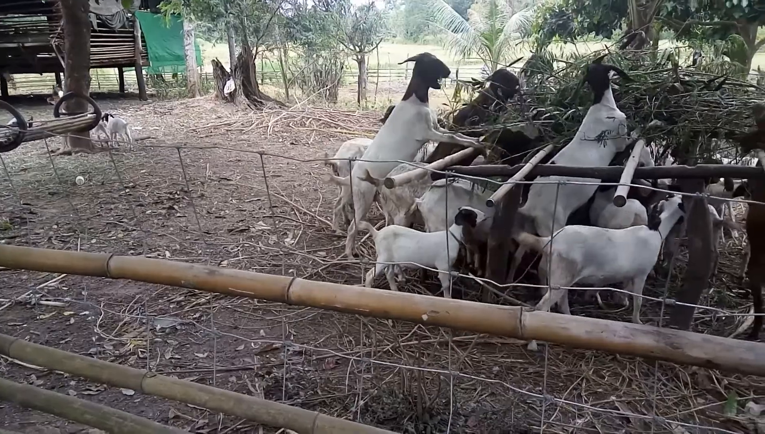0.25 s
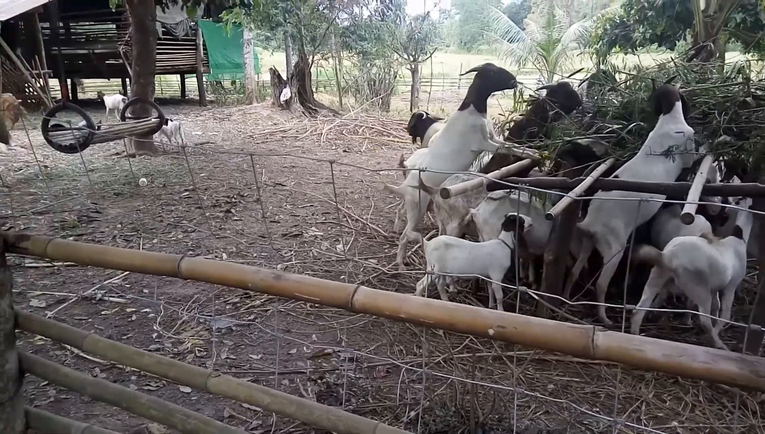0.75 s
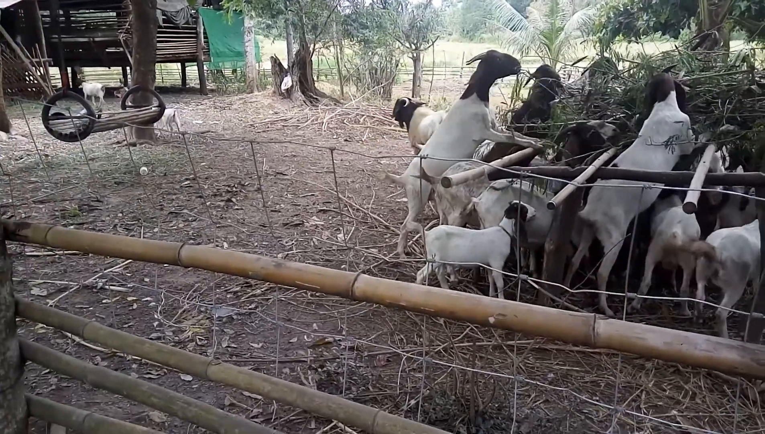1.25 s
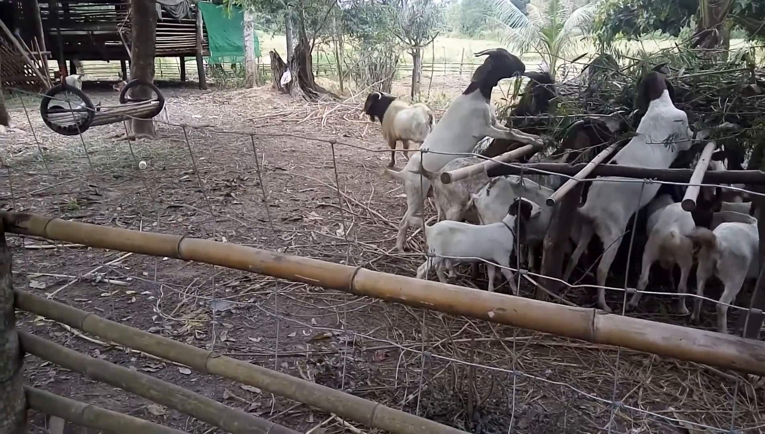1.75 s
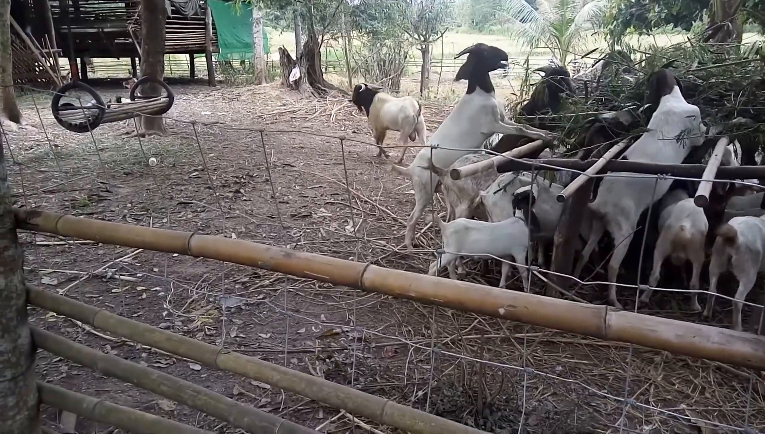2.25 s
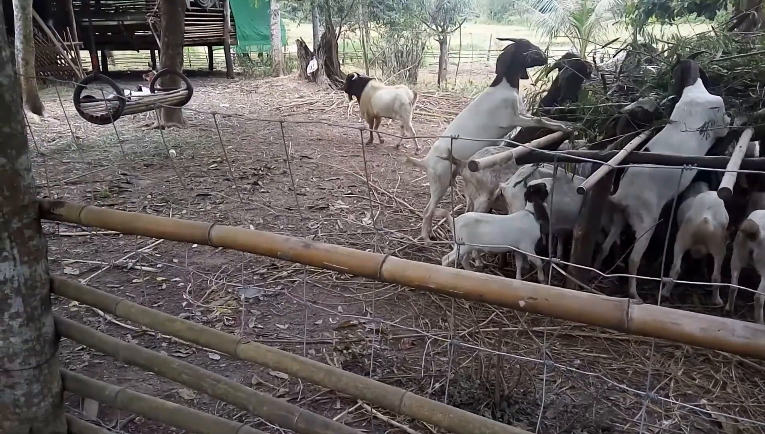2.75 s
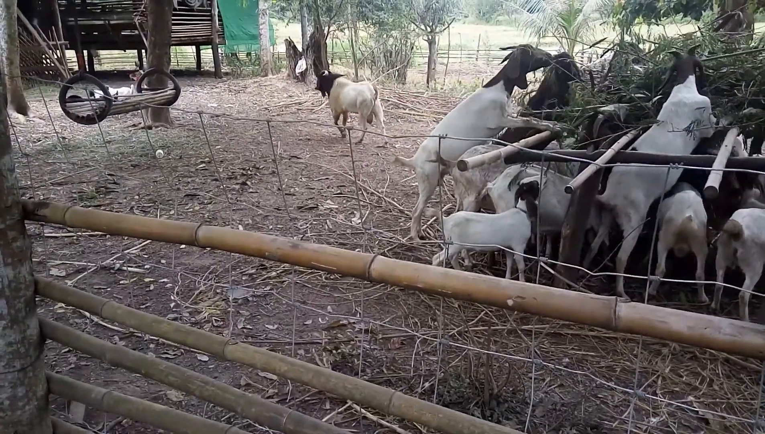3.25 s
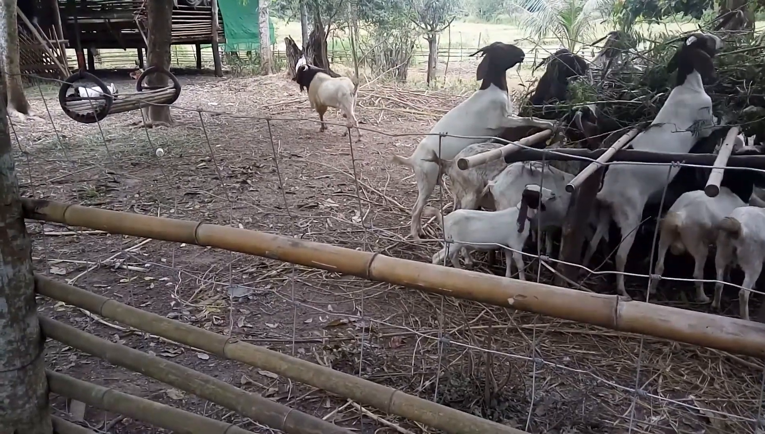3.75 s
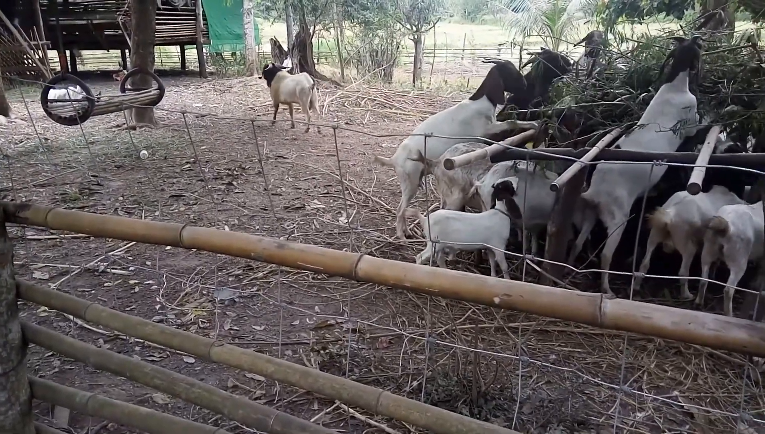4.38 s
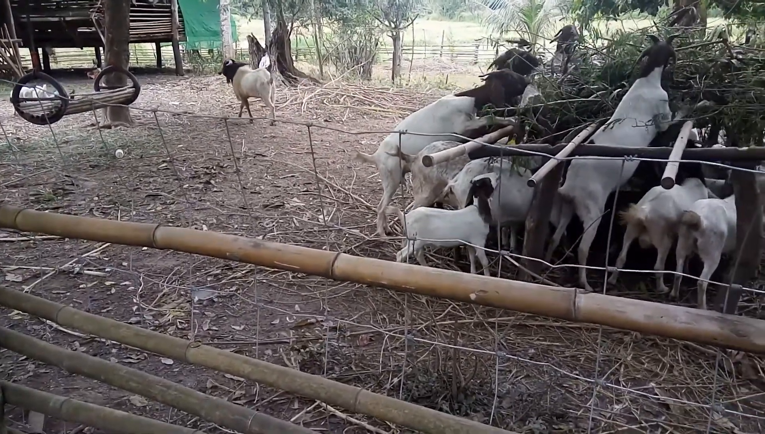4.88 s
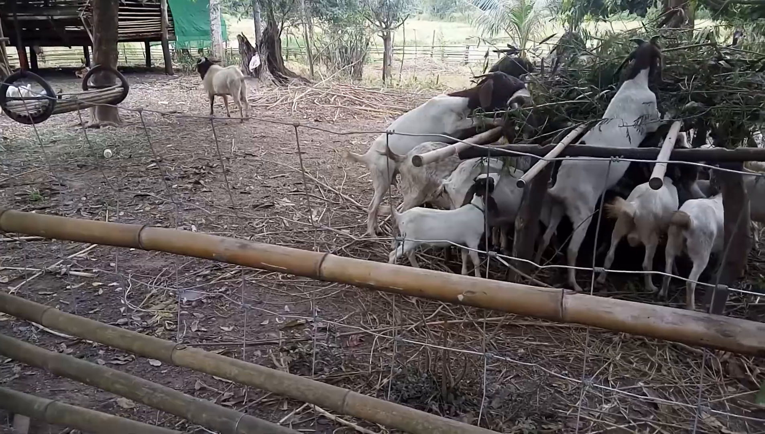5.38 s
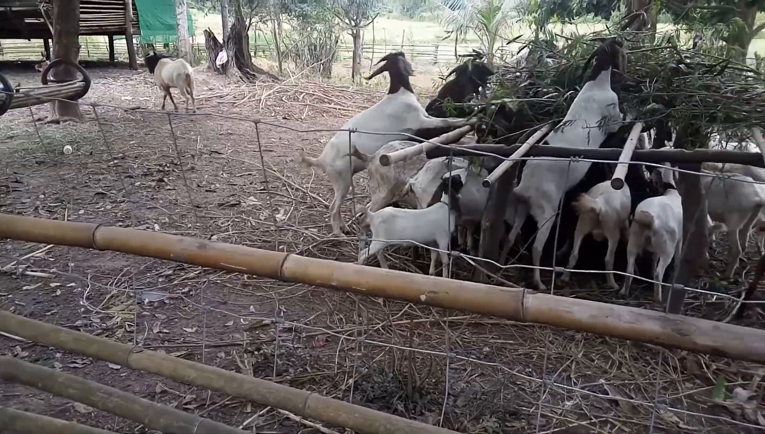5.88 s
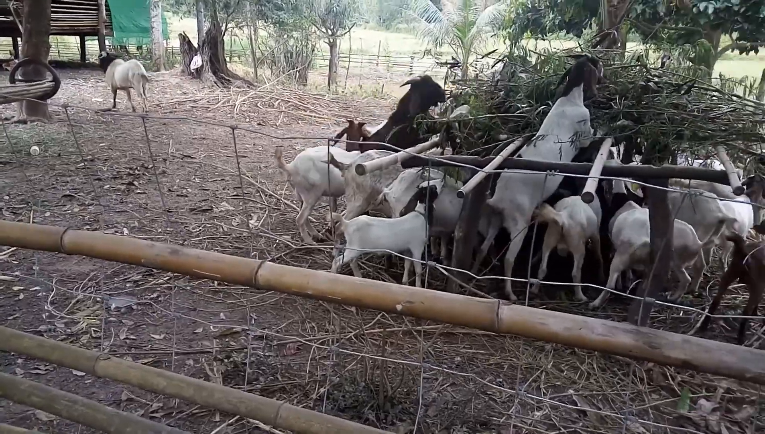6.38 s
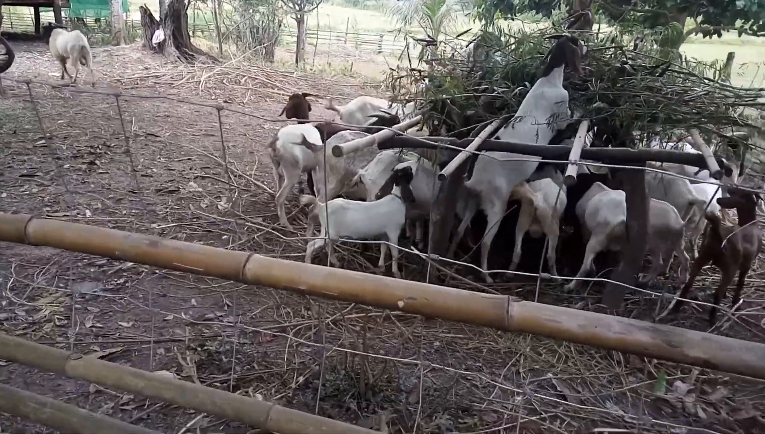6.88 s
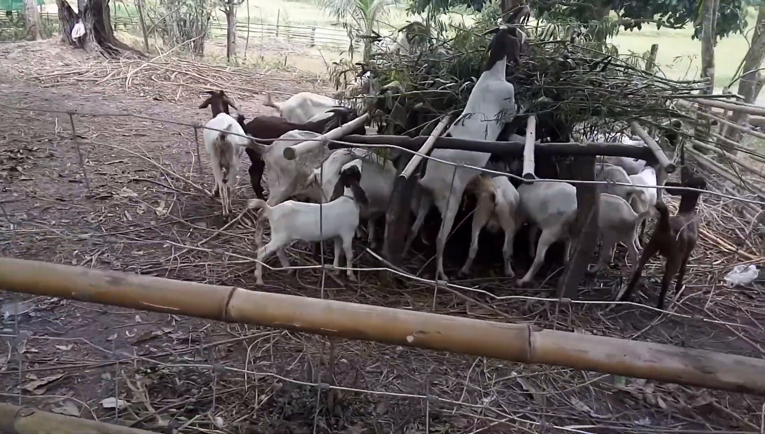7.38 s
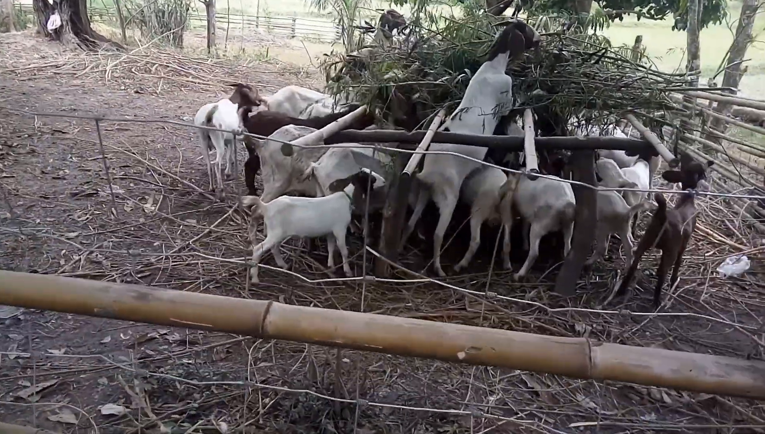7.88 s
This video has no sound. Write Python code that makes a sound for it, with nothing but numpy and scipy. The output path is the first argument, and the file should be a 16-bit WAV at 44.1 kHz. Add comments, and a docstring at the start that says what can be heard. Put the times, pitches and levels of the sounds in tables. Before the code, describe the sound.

Close outdoor view of a goat herd stripping a pile of leafy branches in a dirt pen. Bright, crackly rustling surges and eases constantly, peppered with sharp twig snaps. Soft hoof knocks and litter shuffling sit beneath. A small neck bell tinkles now and then, a fainter one answers on the left, and light wind bumps the right side of the hand-held phone's stereo microphone.

```python
"""Goats strip a heap of leafy branches a few metres from a hand-held phone, in light wind on its right port.
From the start, noise bands under swelling levels rustle as leaves, short noise bursts snap as twigs and
damped modes knock as hooves; a near neck bell of beating tone pairs tinkles on and off throughout.
From 1.5 s single tones make a fainter bell on the left; low ringing wind puffs peak near 2.2 s, and three
short high tones squeak near 6.3 s. The phone ducks its gain around the loudest snaps."""
import sys
import numpy as np
from scipy import signal
from scipy.fft import rfft, irfft
from scipy.io import wavfile
from scipy.ndimage import uniform_filter1d

SR = 44100
rng = np.random.default_rng(int(sys.argv[2]) if len(sys.argv) > 2 else 0)


def dump_mix(stems):
    """Bounce the given channels to the path in sys.argv[1] as a 16-bit WAV at rate SR."""
    frames = np.atleast_2d(stems).T  # one column per channel
    limited = np.clip(frames, -1, 1)  # hard clip at full scale
    pcm = np.round(limited * 32767).astype(np.int16)
    wavfile.write(sys.argv[1], SR, pcm)


N = 358533
T = np.arange(N) / SR

# Puffs thumping the right port. Each row: start in seconds, peak in dB, pitch in Hz.
WIND_PUFFS = [(0.039, -26, 95.5), (1.289, -31, 98.38), (1.469, -30, 101), (2.103, -30.5, 116),
              (2.209, -14, 129), (2.26, -19, 113), (2.298, -30, 135), (2.319, -30, 109), (2.589, -28.5, 94),
              (2.665, -23, 115.7), (2.739, -33, 101), (2.844, -34, 122), (3.789, -28, 117),
              (4.813, -27, 97.81), (4.911, -23, 100.7), (4.968, -25, 154), (5.157, -22, 107.6),
              (5.26, -28.5, 142.2), (5.299, -25, 107.4), (5.533, -22.5, 160.5), (5.56, -26.5, 144),
              (6.004, -26, 86.58), (6.053, -23, 95), (6.165, -21, 106.2), (6.477, -24, 100.1)]
# Loudness of feet shuffling in litter. Each row: time in seconds, level in dB.
SHUFFLE_LEVEL = [(0.0, -37), (0.4, -44.5), (1.65, -43.5), (2.8, -47), (3.26, -42.5), (3.58, -46),
                 (4.21, -41), (5.2, -44), (5.43, -41), (5.98, -49), (6.27, -38.5), (6.84, -39.5),
                 (7.61, -41.5), (7.81, -44.5), (8.13, -43.5)]
# Tone balance of the shuffling. Each row: frequency in Hz, relative level in dB per Hz.
GROUND_SPECTRUM = [(18, -45), (30, -4), (43, -38), (82, 4.5), (108, 0), (345, 3.5), (457, -7.5), (555, -3),
                   (860, -1), (1290, -13.5), (2000, -6), (2600, -34), (4400, -120)]
# How alike the ground sounds at both ports. Each row: frequency in Hz, likeness (held to 0..1 in use).
PORT_LIKENESS = [(60, 0.5534), (130, 1), (290, 0.91), (640, 0.7137), (1410, -0.0887), (3100, -0.12),
                 (6820, -0.07), (15000, -0.01)]
# Blows of the distant bell, its pitch wavering as it swings. Each row: start in seconds, level in dB, pitch in Hz.
DISTANT_BLOWS = [(1.5016, -35.5, 3167), (1.5444, -37.5, 3200), (1.6483, -37, 3170), (1.735, -38, 3100),
                 (1.8244, -38.5, 3195), (2.704, -37.5, 3093), (3.3189, -38, 3080), (3.419, -36.5, 3080),
                 (3.4694, -34.5, 3104), (3.5746, -34, 3155), (3.6677, -34, 3139), (7.435, -37.5, 3062),
                 (7.5238, -35, 3096)]
# Green wood rubbing on a pole. Each row: start in seconds, level in dB, pitch in Hz.
WOOD_SQUEAKS = [(6.2701, -30.5, 2400), (6.316, -33, 2370), (6.3704, -33, 2425)]
# Clapper blows on the near bell. Each row: start in seconds, level in dB, extra level of the upper pair in dB.
CLAPPER_BLOWS = [(0.0359, -32, -8), (0.778, -32, 5), (0.84, -35, -8), (1.5594, -34.5, -4), (1.709, -36, -8),
                 (2.1171, -34, 0.5), (2.3755, -34, 6), (2.9665, -31.5, 1), (3.5838, -33.5, 1.5),
                 (4.0861, -25, 3), (4.3097, -39, 4), (5.616, -33, 3), (5.673, -35, -9), (7.1594, -35, -6)]
# Split mode pairs that beat. Each row: pitch in Hz, relative level in dB, free 60 dB decay in seconds.
BELL_MODES = [(3978, 0, .9), (3950, -8, .6), (9706, 0, .4), (9678, -7, .4)]
# Hoof falls. Each row: time in seconds, level in dB, pitch of the ring in Hz, toe knock against the ring in dB.
HOOF_FALLS = [(0.073, -35, 377, -4), (0.279, -34.5, 1056, -13), (0.693, -38, 470.3, 3),
              (0.87, -38, 394.5, 3.5), (1.2, -36.5, 805, -6), (1.577, -34, 261.5, 4.5),
              (1.782, -40, 936.2, -2), (1.859, -33, 504.6, 1), (2.186, -32.5, 253, 1.5),
              (2.375, -38, 900, -3), (2.483, -35, 320, 4.5), (2.545, -34, 266.4, -7.5),
              (2.763, -32.5, 517.5, -1), (2.833, -39, 444, -2), (2.867, -36, 360, 5.5),
              (3.066, -31, 277, 0.5), (3.369, -32.5, 244.9, 3), (3.606, -36, 671.5, 4.5),
              (3.713, -36, 202, -12), (3.904, -27, 269.2, -4), (4.094, -30.5, 318, -17.5),
              (4.181, -32, 318.6, -15), (4.237, -35, 304, -4), (4.555, -30, 895, -0.5),
              (4.846, -32, 323.4, -3), (5.093, -36, 349.8, -3), (5.274, -32, 890, -9),
              (5.507, -34, 907, -17.5), (5.958, -24.5, 445, -2.5), (6.273, -28.5, 255, -1.5),
              (6.315, -29, 263, -12.5), (6.475, -32.5, 770, -6), (6.556, -31, 403, -13.5),
              (6.621, -33, 312, -12), (6.771, -30, 375, -5), (7.023, -38, 1032, -12.5),
              (7.176, -41, 340, -6), (7.213, -33.5, 340.9, -13), (7.408, -30, 360, 2),
              (7.492, -38, 385, -4), (7.709, -34, 960, 0), (8.063, -35, 430.2, -11)]
# Brittle stalks. Each row: start in seconds, tick level before leaf colour in dB, level of the shrill part in dB.
BRITTLE_STALKS = [(0.9757, -19, 5), (1.257, -6, 2.5), (2.417, -11, -4), (2.8003, -8, 0.5), (4.853, -12, 5),
                  (6.417, -20.5, 2.5), (6.699, -21.5, 2.5), (7.7778, -14, 5), (8.053, -16, 2),
                  (8.111, -19.5, -7.5)]
# Twig snaps. Each row: start in seconds, crack level before leaf colour in dB, centre in Hz,
# woody knock against the crack in dB, left minus right in dB.
TWIG_SNAPS = [(0.0172, -17, 3980, -14.5, 0.5), (0.2, -15.5, 4790, -24, 4.5), (0.2144, -13, 4220, -27, 3),
              (0.2325, -17, 5510, -22, 2), (0.347, -18.5, 5500, -20, 3), (0.405, -15, 6160, -21, -5),
              (0.4496, -9.5, 11300, -5, 4), (0.472, -8.5, 5960, -28, 1.5), (0.607, -18, 11300, -7, 8),
              (0.631, -5.5, 6258, -17, 7), (0.7512, -17, 6480, -15.5, 1.5), (0.848, -12, 4770, -20, 10),
              (1.048, -15, 5243, -20, 6), (1.072, -18.5, 12200, -20.5, 1), (1.108, -20, 11400, -20, 1.5),
              (1.196, -15.5, 11400, -9, 2), (1.2506, -16, 11700, -21.5, 6.5),
              (1.314, -17, 4040, -13.5, -1.5), (1.3703, -16.5, 11200, -12, 1.5),
              (1.5802, -19, 5210, -22.5, -1), (1.7809, -14, 5480, -24, -3.5), (1.9763, -17, 11100, -27, 0),
              (2.0795, -12, 11700, -34, -1), (2.4537, -11.5, 6030, -16, -2), (2.5065, -23, 12300, -25, -1),
              (2.569, -15.5, 6570, -26, -3), (3.026, -16, 3860, -24, 4), (3.364, -22, 5950, -20, -0.5),
              (3.529, -11.5, 6890, -13.5, 0.5), (3.664, -11.5, 11200, -28.5, 2),
              (3.849, -16, 11500, -22, 1.5), (3.9545, -19, 4970, -24, 11), (4.063, -18, 11200, -28.5, 1.5),
              (4.85, -17, 12200, -20.5, 7), (4.858, -7, 12000, -30.5, 2), (4.907, -18, 11400, -33.5, 2),
              (5.2018, -18, 4970, -34, 20), (5.2123, -10, 5040, -39, 11), (5.404, -8.5, 6270, -7, -4),
              (5.71, -20, 5670, -20, -3.5), (5.787, -10, 11700, -25, 2.5), (5.641, -19, 11500, -26, 2),
              (5.8308, -9, 5160, -28.5, 7), (5.917, -14, 6170, -22.5, 5), (5.9698, -17.5, 11700, -12, 1),
              (6.0065, -13, 4730, -22, 1), (6.083, -18.5, 12000, -29, 1.5), (6.0945, -16, 11300, -29, 5),
              (6.7042, -10.5, 11200, -17.5, 11.5), (7.027, -21, 3000, -2, -3.5),
              (7.1072, -14.5, 11300, -13.5, 6), (7.2583, -13.5, 4010, -20, 4.5),
              (7.4117, -16.5, 4886, -27, 7), (7.4839, -17, 5280, -13, 5.5), (7.721, -21.5, 5430, -18, -1.5),
              (7.726, -21, 3480, -11.5, -4), (7.8038, -19, 6200, -23, 1.5), (7.9212, -16.5, 12200, -28, 6),
              (7.9595, -18, 3500, -31.5, 15.5)]
# Tone balance of the foliage. Each row: frequency in Hz, relative level in dB per Hz.
LEAF_SPECTRUM = [(590, -15), (1000, -9), (1290, -16), (1500, -8.5), (1830, -8), (3190, -2.5), (3670, -1.5),
                 (3930, -1.5), (4210, -2.5), (6180, 0), (8160, -11.5), (11400, 1.5), (13600, -5.5),
                 (14900, 1.5), (16000, -10.5)]
# Difference between the ports. Each row: frequency in Hz, left minus right in dB.
PORT_BALANCE = [(60, -6.0), (110, -5.5), (200, -2.5), (380, -1.5), (700, -3), (1290, 2), (2380, 3),
                (4400, 0.5), (8120, 2), (15000, 0)]
# Pulls at the heap. Each row: peak time in seconds, level of the middling leaves in dB, seconds to swell
# by 10 dB, seconds to fade by 10 dB, heavy leaves against middling in dB, crisp leaves likewise in dB.
LEAF_PULLS = [(0.05, -28, 0.12, 0.084, -2, 0.5), (0.228, -25.5, 0.087, 0.15, -5, 0.0),
              (0.399, -32.5, 0.00859, 0.21, -4.5, -3.5), (0.519, -30, 0.084, 0.23, -4.5, -1),
              (0.638, -30.5, 0.008, 0.2541, -3.5, -2.0), (0.839, -30.5, 0.004, 0.19, -6, 0.5),
              (0.956, -33, 0.016, 0.045, 0.5, 3), (1.076, -33, 0.05526, 0.01834, -8.5, 4),
              (1.112, -36.5, 0.01442, 0.291, -4.0, 3), (1.217, -26, 0.067, 0.26, -6, 0.5),
              (1.319, -27, 0.017, 0.0268, -4, -0.5), (1.371, -30.5, 0.004, 0.0773, -5.0, -1),
              (1.496, -35.5, 0.039, 0.0374, 3, 0.5), (1.583, -33, 0.043, 0.093, -1.5, 0),
              (1.74, -31.5, 0.06643, 0.32, -4, 0.5), (1.803, -33, 0.031, 0.041, -2.5, 0.5),
              (1.986, -30.5, 0.036, 0.0668, -10, 4.5), (2.118, -31.5, 0.151, 0.17, -4, 0.5),
              (2.209, -36, 0.0432, 0.12, -10.5, 2), (2.417, -31.5, 0.071, 0.026, -5.5, -0.5),
              (2.462, -31.5, 0.0768, 0.02065, -4.5, -0.5), (2.57, -25, 0.031, 0.054, -7, -3),
              (2.8, -33.5, 0.33, 0.2, -3.5, 2.5), (3.05, -30.5, 0.04987, 0.074, -5.5, -1),
              (3.119, -31, 0.225, 0.13, -7.5, 0.5), (3.365, -30, 0.16, 0.2087, -3.5, -2),
              (3.513, -34, 0.021, 0.0307, -4.0, 0.5), (3.622, -32, 0.219, 0.37, -4.5, 1.5),
              (3.783, -30, 0.0807, 0.2, -5.5, -1.0), (3.952, -32, 0.011, 0.2622, -4.5, -1.0),
              (4.093, -31.5, 0.012, 0.087, -3, 3.5), (4.307, -36, 0.0745, 0.17, -1, 2),
              (4.63, -38, 0.02967, 0.22, 0, -2), (4.852, -34, 0.1027, 0.3, -5.5, -1),
              (4.96, -33.5, 0.094, 0.3, -5.5, 0.0), (5.205, -29.5, 0.0079, 0.201, -4.5, 1.5),
              (5.409, -24.5, 0.00338, 0.07332, -1.5, 2), (5.602, -33, 0.17, 0.15, -3, 2),
              (5.712, -29.5, 0.0101, 0.1486, -2, -3.5), (5.794, -24, 0.066, 0.11, -7.0, -0.5),
              (5.918, -25, 0.01, 0.03134, -3, -5.5), (5.989, -27, 0.073, 0.108, -6.5, -0.5),
              (6.184, -30.5, 0.06302, 0.16, -3.5, 0.5), (6.319, -28.5, 0.02709, 0.12, -3.0, -2),
              (6.41, -29.5, 0.067, 0.02, -2.5, 3), (6.49, -34.0, 0.04213, 0.068, -1.5, -3),
              (6.699, -35, 0.099, 0.31, -9, 3), (6.857, -28.5, 0.2, 0.098, -1, 1),
              (7.028, -33, 0.037, 0.05, -0.5, 3), (7.122, -27, 0.034, 0.18, -1.5, 0.0),
              (7.301, -39.5, 0.042, 0.2984, -3.5, 1), (7.441, -34.5, 0.131, 0.31, -2.0, -0.5),
              (7.487, -32, 0.01, 0.055, -9, 4), (7.644, -30, 0.041, 0.086, -2.5, -1.5),
              (7.726, -28, 0.018, 0.1508, -3, -1), (7.865, -32.5, 0.0238, 0.071, -2, 3),
              (7.96, -25.5, 0.011, 0.086, -4.5, -3), (8.13, -30, 0.16, 0.299, -2.5, -2)]
# Leaf bed between pulls: levels of heavy, middling and crisp leaves in dB.
LEAF_REST_DB = (-45, -41, -39)

CALM_DB, RUMBLE_DB, RUMBLE_FADE_S = -59.5, -38.5, 0.061  # still air, each puff, seconds per 10 dB either side
SHELTER_DB, RUMBLE_SHELTER_DB = -30, -17.0  # left port against right, for puffs and for rumble
TINKLE_T60_S, SQUEAK_T60_S = 0.19, 0.0992
HOOF_PAN_DB = -1.2525  # left minus right
SHAKEN_DB, SHAKEN_T60_S = -14, 0.069  # leaves shaken loose, before leaf colour, against the snap
TOP_HZ = 15900  # highest pitch the phone keeps


def undb(db):
    """Decibels to amplitude."""
    return 10 ** (np.asarray(db) / 20)


def unit(x):
    """Scale to an RMS of 1 over all channels."""
    return x / np.sqrt(np.mean(x ** 2))


def along(table, hz):
    """Read a spectrum on a log-frequency axis."""
    table_hz, values = np.transpose(table)
    return np.interp(np.log(hz + 1), np.log(table_hz + 1), values)


def colour(x, *, shape_db, size=2048):
    """Minimum-phase filter with the given gain in dB at each Hz."""
    hz = np.arange(size // 2 + 1) * SR / size
    cepstrum = irfft(np.log(undb(shape_db(hz))))
    # folding the cepstrum forward makes the filter causal
    cepstrum[1:size // 2] *= 2
    cepstrum[size // 2 + 1:] = 0
    return signal.fftconvolve(x, irfft(np.exp(rfft(cepstrum))))[:N]


def band(x, lo_hz, hi_hz, order=2):
    """Band-pass filter."""
    return signal.sosfilt(signal.butter(order, [lo_hz, hi_hz], "band", fs=SR, output="sos"), x)


def walk(rate):
    """Wander that glides between random values, rate of them a second."""
    k = int(SR / rate)
    steps = np.repeat(rng.standard_normal(N // k + 1), k)
    return 1.48 * uniform_filter1d(steps, k)[:N]


def swells(s, db, rise_s, fall_s, rest_db):
    """Level in dB of overlapping swells, each taking the given seconds per 10 dB, over a resting level."""
    s, db, rise_s, fall_s = (np.reshape(v, (-1, 1)) for v in (s, db, rise_s, fall_s))
    coarse = np.arange(0, N / SR + .01, .002)
    after = coarse - s
    slope = np.where(after < 0, -after / rise_s, after / fall_s)
    power = np.sum(undb(db - 10 * slope) ** 2, axis=0) + undb(rest_db) ** 2
    return np.interp(T, coarse, 10 * np.log10(power))


def add(out, s, sound, pan_db, lag=0):
    """Place a sound at a time, pan_db louder on the left; the left port hears it lag samples late."""
    first = int(s * SR)
    for c, (i, gain_db) in enumerate(((first + lag, pan_db / 2), (first, -pan_db / 2))):
        part = sound[c] if sound.ndim == 2 else sound
        n = min(len(part), N - i)
        out[c, i:i + n] += undb(gain_db) * part[:n]


def ring(hz, t60, rise=0.0003436):
    """One decaying mode with a soft onset; rise is its time constant in seconds."""
    t = np.arange(int(t60 * SR) + 1) / SR
    decay = np.exp(-np.log(1000) * t / t60)
    return np.sin(2 * np.pi * hz * t) * decay * (1 - np.exp(-t / rise))


def burst(noise, rise, fall):
    """Noise under a quick swell and fall (time constants in seconds), peak 1."""
    t = T[:noise.shape[-1]]
    x = noise * (1 - np.exp(-t / rise)) ** 2 * np.exp(-t / fall)
    return x / np.abs(x).max()


def wind():
    """Eddies thump the port and ring its low cut for a few cycles; a lumpy rumble gathers round them."""
    lumps = undb(np.array([walk(21), walk(25)]))
    puff_s = np.array(WIND_PUFFS)[:, 0]
    gust_db = swells(puff_s, RUMBLE_DB, RUMBLE_FADE_S, RUMBLE_FADE_S, CALM_DB)
    rumble = band(rng.standard_normal((2, N)) * lumps, 66, 161, order=3)
    out = unit(rumble) * undb(gust_db)
    out[0] *= undb(RUMBLE_SHELTER_DB)
    for s, db, hz in WIND_PUFFS:
        puff = ring(hz, 0.075, rise=0.0094)
        # half the shelter here and half in the pan leave the right port at full level
        add(out, s, undb(db + SHELTER_DB / 2) * puff / np.abs(puff).max(), SHELTER_DB)
    return out


def ground():
    """Feet in the litter: flickering low noise bands, most alike at both ports near 130 Hz,
    less so below and far less above 1 kHz."""
    out, tread_db = 0, 2.64 * walk(24)
    for hz in 22.5 * 2 ** np.arange(0, 6.6, .5):
        both, left, right = band(rng.standard_normal((3, N)), hz / 2 ** 0.15, hz * 2 ** 0.36)
        alike = np.clip(along(PORT_LIKENESS, hz), 0, 1)
        pair = np.sqrt(alike) * both + np.sqrt(1 - alike) * np.array([left, right])
        flicker_db = tread_db + 2.5 * walk(30)
        out = out + undb(along(GROUND_SPECTRUM, hz) + flicker_db) * pair
    s, level_db = np.transpose(SHUFFLE_LEVEL)
    return unit(out) * undb(np.interp(T, s, level_db))


def chimes(table, t60, pan_db):
    """Faint single tones that die away."""
    out = np.zeros((2, N))
    for s, db, hz in table:
        add(out, s, undb(db) * ring(hz, t60, rise=0.001438), pan_db)
    return out


def distant_bell():
    """A fainter bell on the left, one decaying mode a blow."""
    return chimes(DISTANT_BLOWS, TINKLE_T60_S, 12.64)


def squeaks():
    """Green wood rubs on a pole: short high tones."""
    return chimes(WOOD_SQUEAKS, SQUEAK_T60_S, 1.0)


def bell():
    """A small neck bell of beating mode pairs; each blow sets the upper pair, and the neck soon mutes it."""
    out = np.zeros((2, N))
    split_hz = 2 * BELL_MODES[0][0]  # modes above this are the upper pair
    for s, db, upper_db in CLAPPER_BLOWS:
        free_s = 0.084 * undb(1.3 * (db + 27.5))  # a harder blow swings it clear for longer
        for hz, mode_db, t60 in BELL_MODES:
            tone = ring(hz, t60)
            tone *= np.exp(-np.maximum(T[:len(tone)] - free_s, 0) / 0.0178)
            add(out, s, undb(db + mode_db + upper_db * (hz > split_hz)) * tone, 1.5, lag=3)
    return out


def hooves():
    """The toe knocks first, the weight lands a few ms later and rings ground or pole, grit scuffs after."""
    out, t = np.zeros((2, N)), T[:SR // 6]
    late = int(0.00388 * SR)  # toe to weight, in samples
    for s, db, hz, knock_db in HOOF_FALLS:
        noise = rng.standard_normal((3, len(t)))
        rough_tone = np.sin(2 * np.pi * 590 * (1 + .1 * noise[0, 0]) * t)  # pitch differs a little each step
        toe = rough_tone + 6.0 * band(noise[0], 350, 950)
        step = undb(knock_db) * burst(toe, .002, .006)
        body = ring(hz, 0.058, rise=0.0013015)
        step[late:late + len(body)] += body / np.abs(body).max()
        add(out, s - .003, undb(db) * step, HOOF_PAN_DB)
        grit = burst(band(noise[1:], 164.73, 1020), 0.0038, 0.03)
        add(out, s, undb(db) * grit, HOOF_PAN_DB)
    return out


def shrill(noise):
    """The part of a crack above 17 kHz."""
    return burst(band(noise, 17500, 21000, order=3), .0002, .0008)


def leafy(pair):
    """Colour of the foliage as each port hears it."""
    def port(x, side):
        return colour(x, shape_db=lambda hz: along(LEAF_SPECTRUM, hz)
                      + side * along(PORT_BALANCE, np.maximum(hz, 1000)))
    return np.array([port(pair[0], .5), port(pair[1], -.5)])


def stalks():
    """Brittle stalks tick: very short noise bursts with a shrill part above the range the phone keeps."""
    out, top = np.zeros((2, N)), np.zeros((2, N))
    for s, db, shrill_db in BRITTLE_STALKS:
        noise = rng.standard_normal(300)
        tick = burst(band(noise, 5560, 13000, order=1), 0.000087, 0.00015)
        add(out, s, undb(db) * tick, 4.0, lag=4)
        add(top, s, undb(shrill_db) * shrill(noise), 0)
    return leafy(out) * undb(4.0) + top


def twigs():
    """Each snap is a short crack round its own pitch over a woody knock, then leaves shaken loose."""
    out, top, t = np.zeros((2, N)), np.zeros((2, N)), T[:SR // 10]
    for s, db, hz, wood_db, pan_db in TWIG_SNAPS:
        noise = rng.standard_normal((4, len(t)))
        noise = .5 * noise + 1.071 * band(noise, hz / 1.23, min(hz * 1.28, 18000), order=1)
        crack = burst(noise[0], .0003, .001)
        wood = undb(wood_db) * burst(band(noise[3], 1354.4, 2050), 0.0011, 0.0052)
        add(out, s, undb(db) * (crack + wood), pan_db, lag=4)
        shaken = unit(noise[1:3]) * np.exp(-np.log(1000) * t / SHAKEN_T60_S)
        add(out, s, undb(db + SHAKEN_DB) * shaken, 1.0)
        add(top, s, undb(db + 5.5) * shrill(rng.standard_normal(300)), 0)
    return leafy(out) * undb(4.0) + top


def crackle(rate, spread_db, smear_s):
    """Leaf folds: sparse clicks of uneven size, rate of them a second, each dying away; used as a noise level."""
    size_db = spread_db * np.minimum(rng.exponential(size=N), 3.0)
    folds = (rng.random(N) < rate / SR) * undb(size_db)
    return unit(signal.lfilter([1], [1, -np.exp(-1 / (smear_s * SR))], folds))


def tone_grains(count=2500):
    """Many tiny decaying tones of random pitch, a few ms each, grain the rustle, somewhere left or right."""
    when, pitch, size, side = rng.random((count, 4)).T
    t = T[:400]
    hz = 1200 * 13 ** pitch[:, None]
    level = undb(-4.0 * np.log(size + 0.0485))[:, None]  # few loud, many soft
    tones = np.sqrt(hz) * np.sin(2 * np.pi * hz * t) * np.exp(-t / 0.0022) * level
    place = ((when * N).astype(int)[:, None] + np.arange(len(t))).ravel()
    ports = [np.bincount(place, (tones * g[:, None]).ravel(), N)[:N] for g in (side, 1 - side)]
    return unit(np.array(ports))


def leaves():
    """Heavy, middling and crisp leaves rustle and crackle together as the goats pull."""
    s, db, swell_s, fade_s, heavy_db, crisp_db = np.transpose(LEAF_PULLS)
    folds, shake_db, grains = crackle(150, 3.0, .005), .4 * walk(30), tone_grains()
    out = np.zeros((2, N))
    # low edge and high edge in Hz, level against middling in dB
    sizes = ((700, 4000, heavy_db), (4000, 9000, 0), (9000, 17000, crisp_db))
    # shared: how much of the same noise reaches both ports
    for (lo, hi, rel_db), shared, rest_db in zip(sizes, (.55, .45, .25), LEAF_REST_DB):
        pull_db = swells(s, db + rel_db, np.maximum(swell_s, .002), fade_s, rest_db)
        own_folds = crackle(250, 3.0, .0025)
        near, left, right = rng.standard_normal((3, N))
        pair = np.array([shared * np.roll(near, 5) + left, shared * near + right])
        crackling = pair * (1 + 0.17076 * folds + 0.18084 * own_folds)
        rustle = band(crackling + 0.23 * grains, lo, hi, order=4)
        out += unit(leafy(rustle)) * undb(pull_db + shake_db + 0.836 * walk(40))
    return out


def scene():
    """All layers, from the wind up to the leaves."""
    background = wind() + ground() + distant_bell() + squeaks()
    return background + bell() + hooves() + stalks() + twigs() + leaves()


def record(dry):
    """Gain control lets the first peak through, ducks in about a millisecond, climbs back; then the top is cut."""
    peak_db = 20 * np.log10(np.abs(dry).max(axis=0) + 1e-9)
    over_db = np.maximum(peak_db + 4.5, 0)
    climb_db = 170 * T  # dB per second
    held_db = np.maximum.accumulate(over_db + climb_db) - climb_db
    follow = np.exp(-1 / (.001 * SR))
    gain = undb(-signal.lfilter([1 - follow], [1, -follow], held_db))
    return signal.sosfilt(signal.ellip(10, .3, 80, TOP_HZ, fs=SR, output="sos"), dry * gain)


dry = scene()
out = record(dry)
dump_mix(out)
```